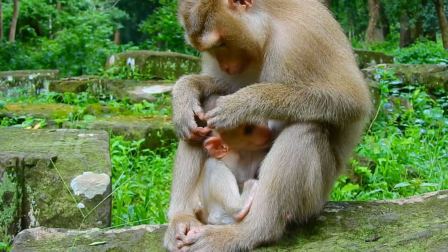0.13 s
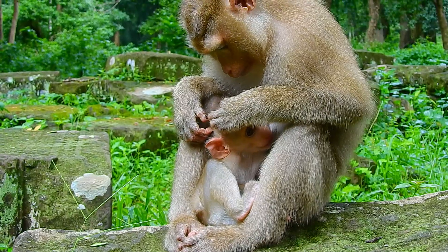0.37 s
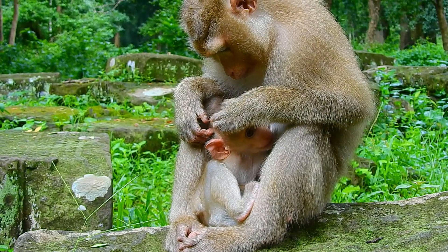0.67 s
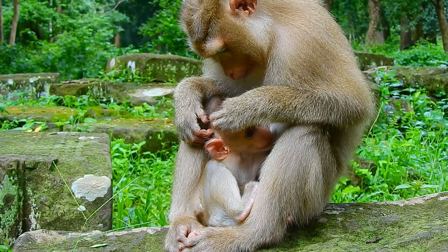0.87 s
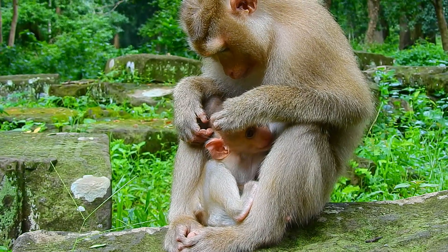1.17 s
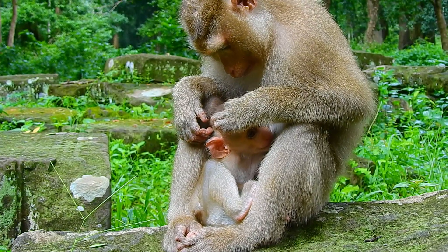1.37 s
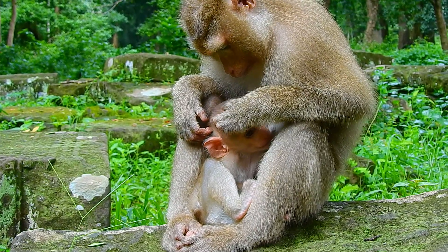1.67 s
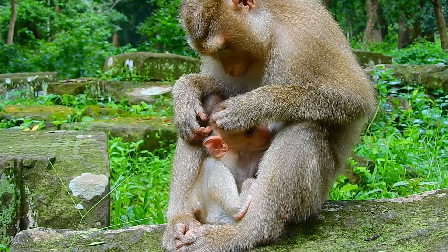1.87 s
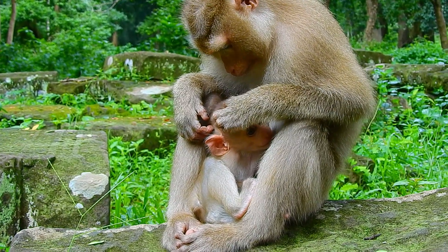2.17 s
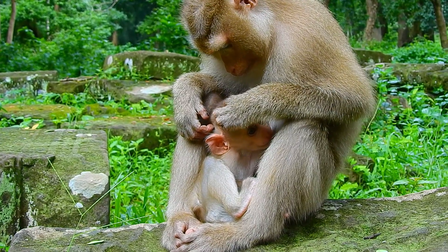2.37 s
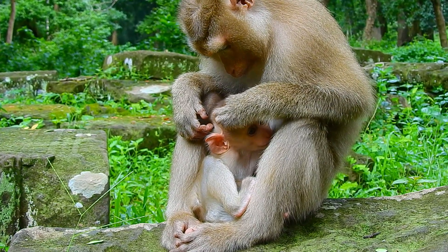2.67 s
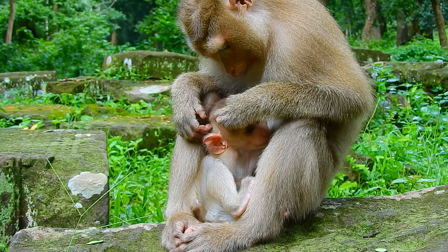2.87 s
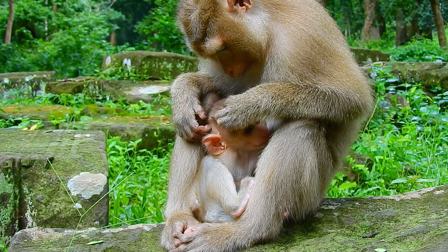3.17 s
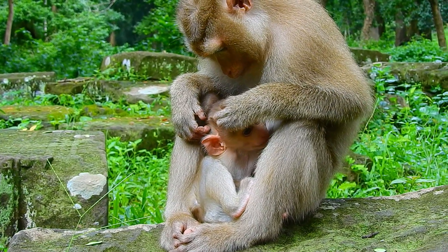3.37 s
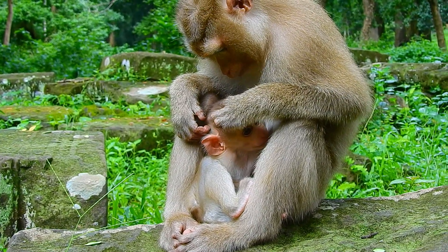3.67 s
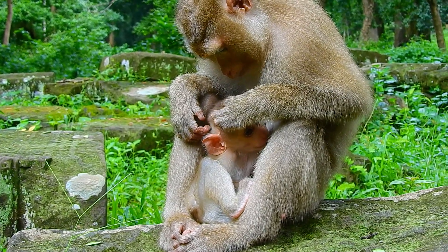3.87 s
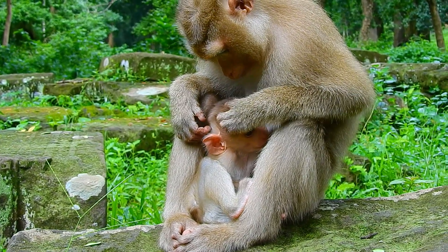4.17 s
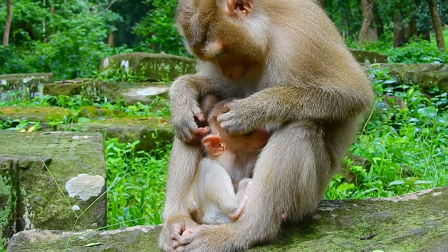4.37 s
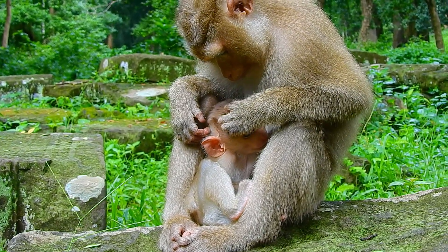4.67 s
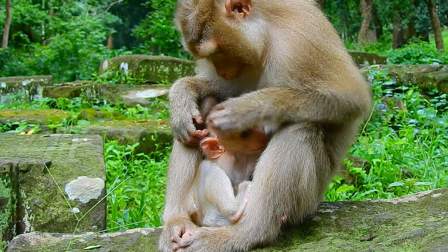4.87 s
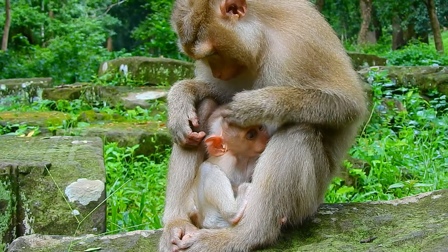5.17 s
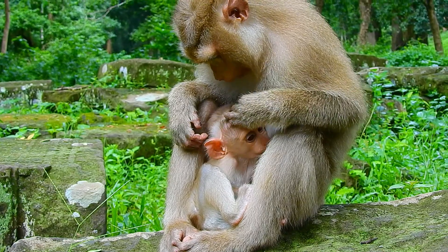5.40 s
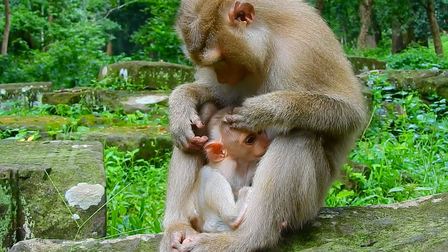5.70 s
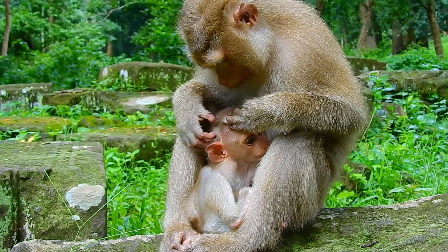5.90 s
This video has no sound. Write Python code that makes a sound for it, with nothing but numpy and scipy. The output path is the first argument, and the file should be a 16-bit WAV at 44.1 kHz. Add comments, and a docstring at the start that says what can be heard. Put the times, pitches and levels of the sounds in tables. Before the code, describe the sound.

A near cricket trills in bursts with short rests over a steady high cicada buzz and a low distant engine rumble in a forest.

```python
"""A forest by day, heard at two close microphone ports. One near cricket sings pairs of swept wing strokes in
trills with rests; two cicadas, made of throbbing clicked noise, buzz over a far chorus of shaped noise.
Faint birds are gliding sine tones. Far crickets, a high insect hiss, a soft wash, brief leaf rustles and a
narrow buzz that swells are shaped noise. Below lie a noise rumble, the harmonics of a far engine and a faint hum."""
import sys
import numpy as np
from scipy import signal
from scipy.fft import rfft, irfft, next_fast_len
from scipy.io import wavfile
from scipy.ndimage import uniform_filter1d, map_coordinates

SR = 44100
rng = np.random.default_rng(int(sys.argv[2]) if len(sys.argv) > 2 else 0)


def pcm_store(signal):
    """Save signal as 16-bit PCM."""
    levels = np.round(np.clip(np.atleast_2d(signal), -1, 1) * 32767)
    wavfile.write(sys.argv[1], SR, levels.astype(np.int16).T)


N = 266364

# Near cricket, one list per trill: nominal peak of the first stroke in each pair (t/s)
TRILLS = [
    [.0269, .0704, .1117, .155, .1975, .2395, .2819, .3249, .3705, .4182, .4619, .5092, .554, .5987, .6446,
     .69, .7338, .776, .8193, .8649],
    [1.1627, 1.2146, 1.2699, 1.321, 1.3707, 1.4182, 1.4648, 1.5101, 1.5532, 1.597, 1.6417, 1.6841, 1.7271,
     1.7686, 1.8121, 1.8559, 1.8985, 1.9402, 1.982, 2.0246, 2.067, 2.1091, 2.1515, 2.1944, 2.2376, 2.282,
     2.3269, 2.3733, 2.4204, 2.4639, 2.5086, 2.5521, 2.5985, 2.6426, 2.6861, 2.7291, 2.7756, 2.8181, 2.8613,
     2.9055, 2.9564],
    [3.2328, 3.285, 3.3406, 3.3948, 3.4451, 3.4925, 3.5405, 3.5872, 3.6312, 3.6738, 3.7178, 3.7593, 3.8015,
     3.8431, 3.8844, 3.9262, 3.9677, 4.0095, 4.0527, 4.0959, 4.1396, 4.1822, 4.2254, 4.2704, 4.3142],
    [4.5341, 4.5864, 4.6413, 4.6918, 4.7398, 4.7881, 4.8327, 4.8775, 4.9218, 4.9635, 5.006, 5.0486, 5.0906,
     5.1327, 5.1748, 5.2161, 5.2576, 5.3032, 5.346, 5.3881, 5.4301, 5.4723, 5.517],
    [5.788, 5.8384, 5.8918, 5.9408, 5.988, 6.0328],
]
# Near cricket, one value per trill: time constant of warming up (t/s)
WARM_UP_S = [0.001, .135, .17, .14, .135]
# Near cricket, pitch bend: (part of the rise (-) or fall (+), deviation f/Hz; the fall is scaled by the sag)
STROKE_BEND = [(-1, -30), (-.4, 45), (0, 15), (.45, -50), (.75, -150), (1, -330)]
# Near cricket, position: (t/s, left minus right level/dB)
CRICKET_PAN = [(0, -4.5), (.9, -4.5), (1.3, -2.5), (3, -2), (4.2, -1), (5.2, -2.5), (6.04, -2.5)]
# Near cicadas: (mean clicks per s, mean throbs per s, throb depth 0-1, click sharpness, relative level/dB,
# left minus right level/dB, left-right likeness)
CICADAS = [(152.3, 63.3, .45, .35, -31, -7, .8), (156.3, 67, .4, .55, -32, -1.5, .7)]
# Relative spectral density of the cicadas: (f/Hz, level/dB)
CICADA_SPECTRUM = [(3240, -58), (5500, -28), (5850, -16.5), (6420, 2), (6640, 6.5), (6930, -5.5),
                   (7470, -28), (8200, -53.5), (10700, -63), (18000, -120)]
# Relative spectral density of the rumble: (f/Hz, level/dB)
RUMBLE_SPECTRUM = [(15, -45), (30, -25), (40, -27), (48, -5.5), (80, -1.5), (110, 0.5), (140, -0.5),
                   (172, -2), (210, -13), (243, -13.5), (330, -29.5), (430, -65), (730, -120)]
# Mean level of the rumble: (t/s, level/dB)
RUMBLE_LEVEL = [(0, -28), (2, -28), (3, -28.5), (4.3, -29.5), (4.8, -28.5), (5.3, -29), (6.04, -28.5)]
# Far idling engine: (t/s, firing rate f/Hz, level over the rumble/dB)
ENGINE = [(0, 23, -4), (1.6, 23.05, -4), (2.4, 23.1, -6), (3.2, 23, -10), (4.2, 23.35, -8), (5, 23.45, -7),
          (6.04, 23.6, -10)]
# Mean colour of the engine's harmonics: (f/Hz, relative level/dB)
EXHAUST = [(46, -24), (69, -23), (92, -13), (115, -4), (138, -4), (161, -6), (184, -10.5), (207, -13)]
# Peak level of the hum: (t/s, level/dB)
HUM_LEVEL = [(0, -57), (2, -47), (3, -42), (6.04, -40)]
# Relative spectral density of the wash: (f/Hz, level/dB)
WASH_SPECTRUM = [(160, -61), (280, -4.5), (335, -2), (464, -7.5), (508, -8), (594, -7), (805, -4),
                 (900, -7), (1050, -6.5), (2020, -13), (2620, -14.5), (3790, -16), (4100, -23), (5330, -54),
                 (9020, -120)]
# Mean level of the wash: (t/s, level/dB)
WASH_LEVEL = [(0, -41), (.6, -42), (1.1, -41), (1.5, -40), (2, -40.5), (3, -40), (3.5, -40.5), (3.9, -40),
              (5.15, -40.5), (6.04, -42.5)]
# Left-right likeness of the broad layers: (f/Hz, correlation)
ALIKE = [(60, .95), (130, 1.0), (300, 0.98), (670, .95), (1000, .88), (2220, 0.73), (3320, 0.77),
         (4960, 0.49), (11100, 0.38)]
# Balance of the broad layers: (f/Hz, left minus right level/dB)
LEAN = [(450, 0), (670, 1), (1490, 1.5), (3320, .5), (7410, -3.5), (11100, 0)]
# Relative spectral density of the far crickets: (f/Hz, level/dB)
FAR_CRICKET_SPECTRUM = [(2290, -46), (3900, -18.5), (4230, -9.5), (4350, -4), (4570, 1), (4820, 5.5),
                        (4990, -1), (5170, -2), (5370, -15), (5700, -9.5), (7410, -42), (12500, -120)]
# Relative spectral density of the insect hiss: (f/Hz, level/dB)
HISS_SPECTRUM = [(4650, -29), (7900, 2.5), (8450, -1), (8990, -2.5), (9920, 6), (10600, 6.5), (11000, 6),
                 (11500, -6), (15000, -38), (22000, -120)]
# Short bird notes: (start t/s, length t/s, start f/Hz, end f/Hz, peak level before a common change/dB)
BIRD_NOTES = [(0.22, .014, 5950, 5650, -31), (.236, 0.018, 5700, 5450, -32), (0.255, .014, 5450, 5200, -36),
              (.42, 0.016, 6100, 5900, -46), (.434, .026, 5620, 5500, -40), (.45, .012, 5350, 5200, -41),
              (.57, .016, 5200, 5450, -32), (.58, 0.012, 5500, 5900, -35), (.588, 0.016, 5850, 6000, -39),
              (.657, .012, 5950, 5600, -38), (0.662, 0.011, 5450, 5250, -37),
              (.684, 0.012, 5250, 5550, -31), (0.69, .014, 5350, 5550, -38), (0.71, .012, 5550, 5600, -39),
              (0.714, 0.011, 5650, 5400, -40), (.746, .016, 5250, 5500, -38), (.757, 0.01, 5600, 5950, -41),
              (0.87, 0.018, 5860, 5680, -35), (.88, 0.018, 5670, 5520, -34), (.897, .016, 5400, 5250, -37),
              (.91, .012, 5200, 5000, -39), (1.083, .024, 5900, 5200, -41), (4.015, .012, 8400, 7500, -40)]
# Low falling call: (t/s, mean f/Hz, mean rms level/dB)
COO = [(.655, 680, -51), (.69, 700, -49), (.72, 722, -48), (.75, 730, -43.5), (.775, 708, -47),
       (.795, 670, -46), (.82, 590, -48.5), (.845, 525, -47.5), (.865, 500, -53)]
# Brief faint tones: (start t/s, length t/s, start f/Hz, end f/Hz, peak level before a common change/dB)
FAINT_TONES = [(1.37, .08, 910, 890, -47), (2.92, .08, 2520, 2520, -52), (2.96, .08, 2340, 2310, -50),
               (3.07, .06, 2560, 2550, -53), (3.33, .13, 2245, 2230, -51), (3.36, .08, 2520, 2520, -52),
               (3.37, .06, 2680, 2670, -51)]
# Thin high whistle: (t/s, mean f/Hz, mean rms level/dB)
SEEP = [(1.56, 8110, -65), (1.59, 8060, -58), (1.65, 7930, -61), (1.71, 7935, -57.5), (1.76, 7960, -63),
        (1.82, 7970, -68), (1.88, 7970, -68), (1.93, 7970, -73)]
# Leaf rustles: (peak t/s, half length t/s, mean level/dB)
RUSTLES = [(1.345, .09, -41), (5.21, .04, -54)]
# Relative spectral density of the leaves: (f/Hz, level/dB)
LEAF_SPECTRUM = [(300, -20), (900, 0), (2000, -4), (4000, -5), (8000, -18), (11000, -35)]
# Swells of the narrow buzz: (peak t/s, half length t/s, level/dB)
BUZZ_SWELLS = [(2.2, .15, -54), (2.5, .18, -53), (2.96, .14, -50), (3.38, .11, -50)]
# Relative spectral density of the narrow buzz: (f/Hz, level/dB)
BUZZ_SPECTRUM = [(1700, -40), (2100, -2), (2400, 0), (2750, -2), (3300, -40)]
# Far piping bird: (peak t/s, half length t/s, mean level/dB)
PIPES = [(4.925, .025, -48), (5.365, .028, -44.5), (5.445, .03, -52), (5.495, .022, -48.5),
         (5.745, .04, -44.5), (5.835, .04, -46.5), (5.92, .04, -54)]

# Near cricket; pairs of values are for the first and second stroke.
STROKE_DB, WEAK_DB = (-18.9, -18.7), (4, 8.5)  # level at full effort; loss when cold
PITCH_HZ, CLIMB_HZ_PER_S, FLAT_HZ = 5047, 3.8, (50, 150)  # the pitch creeps up; flattening when cold
PAIR_GAP_MS, COLD_GAP_MS = 12.1, .8  # peak to peak; lengthening when cold
SCATTER_DB, SCATTER_HZ, SCATTER_MS = .42, 6, .35  # standard deviations
FALTER_S, FALTER_LATE_MS = 1.6841, 2  # one second stroke comes late and wholly cold
FIRST_COLD = .12  # the first trill stays a little short of full effort
RISE_MS, FALL_MS, CUT_MS = 6.9, (4.2, 5.2), 3  # the first stroke is cut off
COLD_RISE, COLD_FALL_MS = .75, 2.5  # rise time factor and lengthening of the fall when cold
REBOUND_MS, REBOUND_DB, REBOUND_FLAT_HZ = (4.4, 5.6), (-14, -25), (180, 550)  # a last twitch
SAG_LEAST, SAG_SPREAD = (1.1, .7), (1.7, 1.2)  # factor on the falling bend
PORT_LEAD = 1.03 * np.array([[.5], [-.5]])  # phase in radians, left and right


def amp(db):
    """Level: decibels to an amplitude ratio."""
    return 10 ** (np.asarray(db) / 20)


def unit(x):
    """Normalisation to an rms of 1."""
    return x / np.sqrt(np.mean(x ** 2) + 1e-20)


def along(points, hz):
    """Interpolation of (f/Hz, value) points on a logarithmic frequency axis."""
    f, v = np.transpose(points)
    return np.interp(np.log(hz + 1), np.log(f + 1), v)


def curves(rows):
    """Linear interpolation in time: one value per sample for each column after t/s."""
    s, *cols = np.transpose(rows)
    return [np.interp(np.arange(N) / SR, s, c) for c in cols]


def wobble(rate):
    """Slow fluctuation: a smooth curve through random knots, rate of them per second."""
    coarse = np.arange(0, N + 32, 32)
    knots = rng.standard_normal(int(N * rate / SR) + 4)
    smooth = map_coordinates(knots, [coarse * rate / SR])
    return np.interp(np.arange(N), coarse, smooth)


def swells(rows):
    """Gaussian envelopes from (peak t/s, half length t/s, level/dB) rows."""
    t = np.arange(N) / SR
    return sum(amp(db) * np.exp(-((t - s) / half) ** 2) for s, half, db in rows)


def sides(pan_db):
    """Level difference between the ports, shared equally by left and right."""
    return amp(np.array([pan_db / 2, -pan_db / 2]))


def filtered(x, response):
    """Linear filtering: the spectrum times a response of frequency."""
    m = next_fast_len(N + SR // 2)
    return irfft(rfft(x, m) * response(np.fft.rfftfreq(m, 1 / SR)), m)[..., :N]


def rush(spectrum, alike, lean, lead=0, gate=1):
    """Partly coherent noise of rms 1: shared and opposed parts set the likeness; left leads by lead radians."""
    m = next_fast_len(N)
    hz = np.fft.rfftfreq(m, 1 / SR)
    turn = np.arccos(np.clip(along(alike, hz), -1, 1)) / 2
    noise = rfft(gate * rng.standard_normal((2, N)), m)
    mid, side = noise * [np.cos(turn), np.sin(turn)]
    phase = np.exp(.5j * lead * np.array([[1], [-1]]))
    place = sides(along(lean, hz)) * phase
    ports = np.array([mid + side, mid - side]) * place * amp(along(spectrum, hz))
    return unit(irfft(ports, m)[:, :N])


def patchy(x, patchy_db):
    """Uneven energy: random patches of gain over time and frequency, common to both ports; rms 1."""
    z = signal.stft(x, nperseg=512)[2]
    field = uniform_filter1d(rng.standard_normal(z.shape[1:]), 4, 0)  # frequency
    field = uniform_filter1d(field, 24, 1)  # time
    return unit(signal.istft(z * amp(patchy_db * unit(field)), nperseg=512)[1][:, :N])


def echoes(dry, t60):
    """Scattering from trunks and leaves: a decaying noise tail, independent at each port."""
    t = np.arange(SR // 4) / SR
    tail = rng.standard_normal((2, len(t))) * amp(-60 * t / t60) * (t > .003)
    tail = tail / np.linalg.norm(tail[0])  # unit energy on the left
    return signal.fftconvolve(dry * np.ones((2, 1)), tail, axes=1)[:, :N]


def strokes():
    """Warming up: rows (t/s, level/dB, f/Hz, 0 first or 1 second, cold 0-1), from weak and flat to full effort."""
    s = np.concatenate(TRILLS)
    since = np.concatenate([(np.array(trill) - trill[0]) / warm for trill, warm in zip(TRILLS, WARM_UP_S)])
    cold = np.where(s > TRILLS[0][-1], np.exp(-since ** 2), FIRST_COLD)
    falter = s == FALTER_S
    cold = np.array([cold, np.maximum(cold, falter)])
    chance = rng.standard_normal((len(s), 5)).T
    gap_ms = PAIR_GAP_MS + COLD_GAP_MS * cold[1] + FALTER_LATE_MS * falter + SCATTER_MS * chance[0]
    at = np.array([s, s + gap_ms / 1000]) + .0004  # all peaks fall .4 ms after their nominal times
    db = np.c_[[*STROKE_DB]] - np.c_[[*WEAK_DB]] * cold + SCATTER_DB * chance[1:3]
    hz = PITCH_HZ + CLIMB_HZ_PER_S * s - np.c_[[*FLAT_HZ]] * cold + SCATTER_HZ * chance[3:]
    return zip(at.ravel(), db.ravel(), hz.ravel(), np.repeat([0, 1], len(s)), cold.ravel())


def cricket():
    """Stridulation: each wing stroke swells, bends down in pitch and stops; the first of a pair is cut shorter."""
    out, ms = np.zeros((2, N + SR)), np.arange(-400, 400) / SR * 1000
    for at, db, hz, second, cold in strokes():
        turn, sag = rng.uniform(0, 1, 2)  # random starting phase and sag
        rise = ms / RISE_MS / COLD_RISE ** cold
        fall = ms / (FALL_MS[second] + COLD_FALL_MS * cold)
        part = np.clip(np.where(ms < 0, rise, fall), -1, 1)
        shape = np.cos(np.pi / 2 * part) ** 1.5
        if not second:
            cut = np.cos(np.pi / 2 * np.clip(ms / CUT_MS, 0, 1) ** 1.5)
            shape = np.where(ms > 0, cold * shape + (1 - cold) * cut, shape)

        bend = np.interp(part, *np.transpose(STROKE_BEND))
        bend = bend * np.where(part > 0, SAG_LEAST[second] + SAG_SPREAD[second] * sag, 1)
        phase = 2 * np.pi * (turn + np.cumsum(hz + bend) / SR) + PORT_LEAD
        stroke = amp(db) * shape * np.sin(phase)

        twitch = amp(db + REBOUND_DB[second] + 6 * (sag - .5)) * (1 - cold)
        twitch = twitch * np.exp(-((ms - REBOUND_MS[second]) / .9) ** 2)
        twitch_phase = 2 * np.pi * (hz - REBOUND_FLAT_HZ[second]) * ms / 1000 + PORT_LEAD
        out[:, round(at * SR):][:, :len(ms)] += stroke + twitch * np.sin(twitch_phase)
    dry = out[:, 400:][:, :N] * sides(curves(CRICKET_PAN)[0])  # drop the lead-in of half a stroke window
    return dry + amp(-24) * echoes(dry, .12)


def strands(buzz, throbs):
    """Comb filtering: each throb partly repeats the last, drawing fine lines that wander together."""
    repeat, drift_hz = .35, 40
    m = next_fast_len(N)
    comb = 1 / (1 - repeat * np.exp(-2j * np.pi * np.fft.rfftfreq(m, 1 / SR) / throbs))
    ring = np.fft.ifft(rfft(buzz, m) * comb, m)[:, :N]  # positive frequencies only, so that they can be shifted
    drift = np.exp(2j * np.pi * np.cumsum(drift_hz * wobble(4)) / SR)
    return unit(np.real(ring * drift))


def cicadas():
    """Tymbal buckling: ribs click in fast bursts that throb with the muscle; the far chorus blurs to a buzz."""
    out = amp(-31) * rush(CICADA_SPECTRUM, [(6000, .1)], [(6000, -1)])  # far chorus
    for clicks, throbs, depth, sharp, db, pan_db, alike in CICADAS:
        buckle = 2 * np.pi * np.cumsum(clicks + .5 * wobble(3)) / SR
        muscle = 2 * np.pi * np.cumsum(throbs + .9 * wobble(4)) / SR
        bursts = np.exp(sharp * np.cos(buckle - .9 * np.sin(muscle)))
        gate = bursts * (1 + depth * np.cos(muscle))
        buzz = rush(CICADA_SPECTRUM, [(6000, alike)], [(6000, pan_db)], lead=-1.2, gate=gate)
        out += amp(db) * strands(buzz, throbs)
    return unit(out) * amp(-28 + 0.073 * wobble(8.1))


def rumble():
    """Low-frequency coherence: noise almost the same at both close ports, of rms 1."""
    return rush(RUMBLE_SPECTRUM, [(50, .9993), (150, .9987), (300, .98)], LEAN)


def engine():
    """Harmonic series: multiples of the firing rate in step, each fading a little with the air between."""
    rate, db = curves(ENGINE)
    turn = 2 * np.pi * np.cumsum(rate) / SR
    harmonics = np.zeros(N)
    for k in range(2, 10):
        level = amp(along(EXHAUST, k * rate.mean()) + 2.5 * wobble(2.5))
        harmonics += level * np.sin(k * turn + .45 * wobble(3))
    return amp(db) * unit(harmonics)


def hum():
    """Pure tone: a faint 50 Hz sine that grows."""
    return amp(curves(HUM_LEVEL)[0]) * np.sin(2 * np.pi * 50 * np.arange(N) / SR)


def wash():
    """Diffuse field: broad forest noise, mostly less alike at the two ports toward the treble."""
    level = amp(curves(WASH_LEVEL)[0] + .5 * wobble(5))
    return level * patchy(rush(WASH_SPECTRUM, ALIKE, LEAN), patchy_db=1.4)


def far_crickets():
    """Superposition: many songs blur to a band of noise near 5 kHz with a flickering level."""
    level = amp(-39.5 + 0.55 * wobble(8.1) + 0.23 * wobble(24.97))
    return level * rush(FAR_CRICKET_SPECTRUM, [(5000, 0.57)], [(5000, -.5)], lead=0.092)


def insect_hiss():
    """Negative correlation: high patchy noise, partly opposed at the two ports."""
    level = amp(-52.5 + 0.73 * wobble(5.2))
    noise = rush(HISS_SPECTRUM, [(8000, -0.27), (11000, -0.32)], [(9000, 0)])
    return level * patchy(noise, patchy_db=2.5)


def glide(hz, gain, rough_db):
    """Frequency modulation: a whistle follows a pitch and a gain, both a little unsteady."""
    gain = gain * amp(rough_db * wobble(60))
    return gain * np.sin(2 * np.pi * np.cumsum(hz * (1 + .005 * wobble(220))) / SR)


def piping_bird():
    """Phase modulation: far pipes on one slightly unsteady pitch."""
    pipe_hz = 1832
    gain = swells(PIPES) * amp(wobble(40))
    return gain * np.sin(2 * np.pi * pipe_hz * np.arange(N) / SR + .4 * wobble(15))


def birds():
    """Swept tones: short notes and faint tones, longer calls that fade in and out, and pipes, all with echoes."""
    notes, calls, t = np.zeros(N), np.zeros(N), np.arange(N) / SR
    waver = 1 + .01 * wobble(200)
    for s, length, hz0, hz1, db in BIRD_NOTES + FAINT_TONES:
        u = np.arange(0, 1, 1 / (SR * length))
        hz = hz0 + (hz1 - hz0) * u
        if length < .03:  # only the short notes are ragged in pitch
            hz = hz * waver[round(s * SR):][:len(u)]
        tone = np.sin(2 * np.pi * np.cumsum(hz) / SR)
        notes[round(s * SR):][:len(u)] += amp(db) * np.sin(np.pi * u) ** 0.62 * tone
    for call, rough_db in ((COO, 1.8), (SEEP, 3)):
        hz, db = curves(call)
        ends = np.clip(np.minimum(t - call[0][0], call[-1][0] - t) / 0.013, 0, 1)
        calls += glide(hz, np.sqrt(2) * amp(db) * ends, rough_db)
    out = notes * amp(1.5 * wobble(150) - 2.5) + calls  # the common change of level
    pipe = piping_bird()
    return out + amp(-7) * echoes(out, 0.35) + pipe + amp(-14) * echoes(pipe, .35)


def leaves():
    """Broadband noise bursts: brief soft rustles with a flickering level."""
    stir = swells(RUSTLES) * amp(1.1 * wobble(60))
    return stir * rush(LEAF_SPECTRUM, ALIKE, LEAN)


def narrow_buzz():
    """Band-limited noise: a patchy buzz near 2.4 kHz swells and fades."""
    return swells(BUZZ_SWELLS) * patchy(rush(BUZZ_SPECTRUM, ALIKE, LEAN), patchy_db=2)


def background():
    """Superposition: rumble and engine share one slowly changing level; the other layers keep their own."""
    low = rumble()
    layers = far_crickets() + insect_hiss() + wash() + narrow_buzz() + hum()
    level = amp(curves(RUMBLE_LEVEL)[0] + 0.3 * wobble(4.6))
    return level * (low + engine()) + layers


def scene():
    """Superposition of all singers, the leaves and the background."""
    return cricket() + cicadas() + birds() + leaves() + background()


def record(dry):
    """Ideal low-pass: nothing passes above the band limit."""
    top_hz = 11676
    return filtered(dry, lambda hz: hz < top_hz)


dry = scene()
out = record(dry)
pcm_store(out)
```